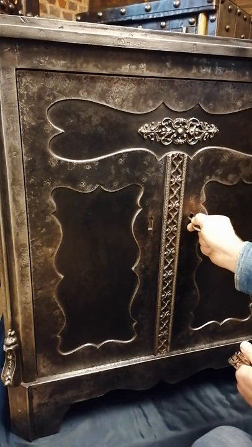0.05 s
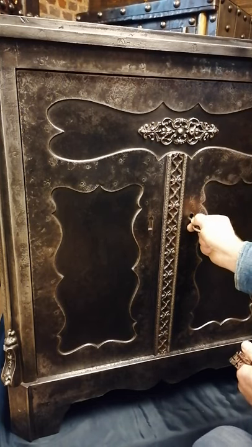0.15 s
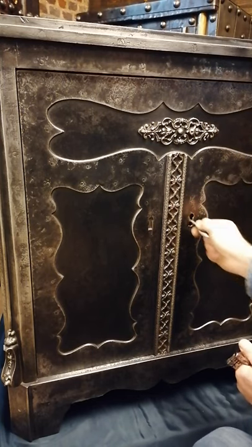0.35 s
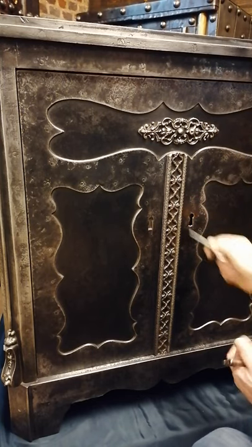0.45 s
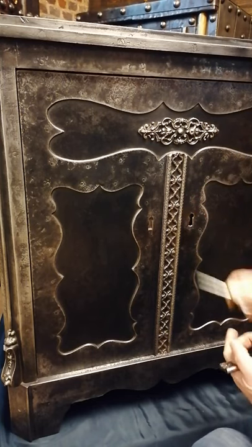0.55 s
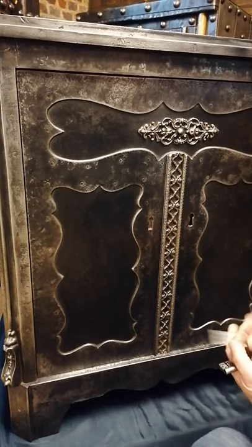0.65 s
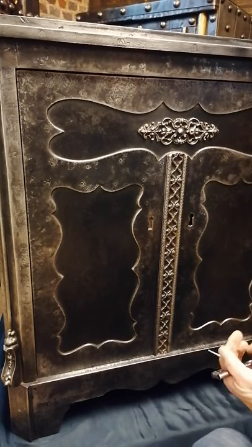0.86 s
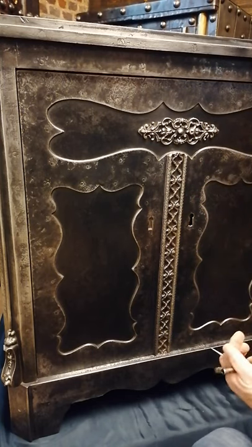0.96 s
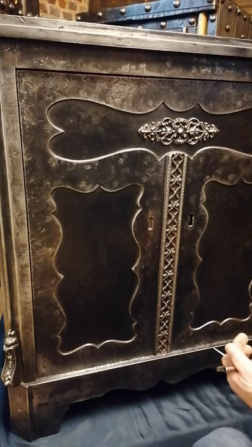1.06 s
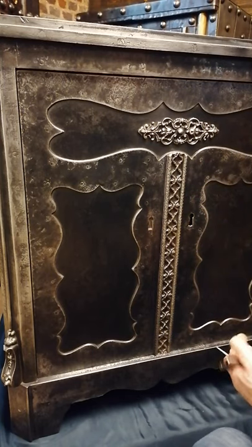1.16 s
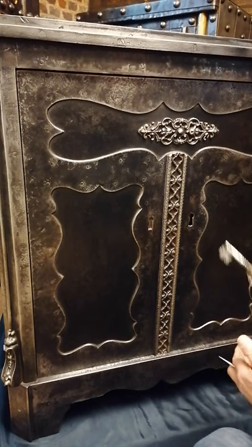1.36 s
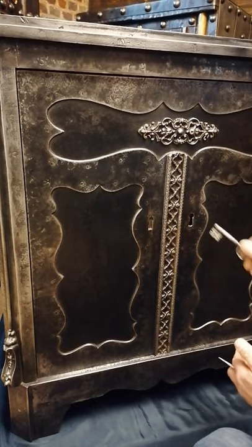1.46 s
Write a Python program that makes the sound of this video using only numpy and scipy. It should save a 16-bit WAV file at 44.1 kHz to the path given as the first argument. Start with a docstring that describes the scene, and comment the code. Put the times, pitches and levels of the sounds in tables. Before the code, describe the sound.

A key knocks softly inside an old iron safe lock, the bolt slams with a booming clang, then the key scrapes and clicks out, ringing thinly; close stereo pickup in a small, lively room, leaning left.

```python
"""A key is turned in an old iron safe: the wards knock softly, then the bolt shoots and the door booms and clangs.
The key clicks and rings as it is drawn out of the keyhole, then taps lightly once it is in the hand.
Contacts are short bursts of coloured noise with a diffuse echo; ringing iron is a sum of decaying modes.
A small, fairly live room with a low wavering hum; the sound leans to the left."""
import sys
import numpy as np
from scipy import signal
from scipy.fft import rfft, irfft
from scipy.io import wavfile

SR = 44100
rng = np.random.default_rng(int(sys.argv[2]) if len(sys.argv) > 2 else 0)


def transcribe(signal):
    """Save signal, clipped to [-1, 1], as a 16-bit WAV file at the path in sys.argv[1]."""
    frames = np.atleast_2d(signal).T
    limited = np.clip(frames, -1, 1)
    pcm = np.round(limited * 32767).astype(np.int16)
    wavfile.write(sys.argv[1], SR, pcm)


N = 66150

# stereo balance of the sources: freq_hz, left_minus_right_db
SOURCE_LEFT_DB = [(60, 5), (150, 6.5), (1000, 7.5), (4000, 4.5), (8000, 10), (15000, 6)]
BACKGROUND_LEFT_DB = 3  # for air and rustle
ALIKE_HZ = 800  # well below this both microphones hear the same wave
SOFT_RISE_S, HARD_RISE_S = .0014, .0003
ECHO_SIZE = 2 ** 15  # samples


def undb(db):
    """Amplitude ratio of a level: 20 dB is a factor of ten."""
    return 10 ** (np.asarray(db) / 20)


def clock():
    """Uniform sampling: the time of each sample in seconds."""
    return np.arange(N) / SR


def decay(t, t60):
    """Exponential damping: the amplitude falls by 60 dB in t60 seconds."""
    return np.exp(-np.log(1000) * t / t60)


def onset(t, rise_s):
    """Contact stiffness: the softer the contact, the slower the force builds up."""
    return 1 - np.exp(-(t / rise_s) ** 2)


def at(table, hz):
    """Interpolation on a log-frequency axis, which gives octaves equal width."""
    freq, value = np.array(table, float).T
    return np.interp(np.log(np.maximum(hz, 1)), np.log(freq), value)


def level_curve(table, offset_db=0):
    """Slow amplitude modulation: the gain follows a level drawn straight from point to point."""
    time_s, level_db = np.array(table).T
    return undb(offset_db + np.interp(clock(), time_s, level_db))


def lean(db):
    """Intensity stereo: left and right gains for a level difference."""
    return undb(np.array([[1], [-1]]) * db / 2)


def noise(colour, left_db=None, size=N):
    """Spatial coherence: coloured stereo noise of unit level, alike in the bass at both microphones."""
    freq = np.arange(size // 2 + 1) * SR / size
    if left_db is None:
        left_db = at(SOURCE_LEFT_DB, freq)
    mid, side = rfft(rng.standard_normal((2, size)))
    # random phases only; the colour alone sets the magnitudes
    mid, side = mid / abs(mid), side / abs(side)
    alike = 1 / (1 + (freq / ALIKE_HZ) ** 2)
    pair = np.sqrt(1 + alike) * mid + np.sqrt(1 - alike) * side * np.array([[1], [-1]])
    gain = undb(at(colour, freq))
    gain = gain * size / (2 * np.linalg.norm(gain))
    return irfft(pair * gain * lean(left_db), size)


def room_tail(colour):
    """Diffuse reverberation of one blow: each octave band dies at its own rate."""
    # reverberation time: freq_hz, t60_s
    room_t60 = [(120, 0.3), (300, 0.88), (1000, .6), (2500, 0.56), (5000, 0.58), (9000, 0.35),
                (15000, 0.17)]
    treble_db, build_s = -1, 0.0052  # treble tilt per 10 kHz; build-up time of the echo
    t = clock()[:ECHO_SIZE]
    freq = np.arange(ECHO_SIZE // 2 + 1) * SR / ECHO_SIZE
    spectrum = rfft(noise(colour, size=ECHO_SIZE)) * undb(treble_db * freq / 10000)
    centres = 125 * 2. ** np.arange(8)
    out = 0
    # each row of the identity picks one octave, with linear crossfades to its neighbours
    for hz, pick in zip(centres, np.eye(len(centres))):
        band = irfft(spectrum * at(np.c_[centres, pick], freq))
        out = out + band * decay(t, at(room_t60, hz))
    return out * (1 - np.exp(-t / build_s))


def add(out, sound, start):
    """Superposition: mixes a sound in from a given time in seconds."""
    i = int(start * SR)
    out[:, i:i + sound.shape[1]] += sound[:, :N - i]


def blows(rows, colour, db, t60, room_db, rise):
    """Impact excitation: each contact sets off a crowd of short-lived resonances, and the room answers."""
    out = np.zeros((2, N))
    t = clock()[:ECHO_SIZE // 8]
    envelope = onset(t, rise) * decay(t, t60)
    for start, size_db in rows:
        direct = envelope * noise(colour, size=len(t))
        add(out, undb(db + size_db) * direct, start)
        add(out, undb(db + size_db + room_db) * room_tail(colour), start)
    return out


def slow_chance(t, hz):
    """Random modulation: a complex drift for each microphone, with hz new values of unit RMS a second."""
    steps = rng.standard_normal((2, 256, 2)) @ np.array([1, 1j]) / np.sqrt(2)
    return np.array([np.interp(t * hz, np.arange(len(row)), row) for row in steps])


def ring(modes, waver):
    """Modal superposition: echoes make decaying modes waver; high ones reach the microphones out of step."""
    waver_hz = 39.6
    out = np.zeros((2, N))
    for hz, db, t60 in modes:
        t = clock()[:int(t60 * SR)]
        phase = (2 * rng.random() - 1) * min(hz / ALIKE_HZ, np.pi)
        skew = np.exp(1j * phase * np.array([[0], [1]]))  # turns the right channel only
        tone = np.exp(2j * np.pi * hz * t) * decay(t, t60)
        tone = tone * (skew + waver * slow_chance(t, waver_hz))
        add(out, undb(db) * lean(at(SOURCE_LEFT_DB, hz)) * tone.imag, 0)
    return out * onset(clock(), HARD_RISE_S)


def room_tone():
    """Stationary background: coloured noise for quiet air, and a sine for the hum that swells and fades."""
    # swell of the hum: time_s, level_db
    hum_level = [(0, -69.5), (.08, -70.5), (.12, -73), (.22, -62), (.28, -79), (.35, -62.5), (.59, -65.5),
                 (.63, -75.5), (.74, -71), (.86, -66), (1.03, -60.5), (1.5, -70)]
    # colour of the air: freq_hz, level_db
    air_colour = [(20, 0.5), (45, -3), (100, -3), (160, -5.5), (250, -15.5), (500, -14.5), (1000, -22.5),
                  (2000, -24.5), (4000, -29), (8000, -35), (15000, -48)]
    hum_hz, hum_db, air_db = 62.9, -0.5, -75
    sine = np.sqrt(2) * np.sin(2 * np.pi * hum_hz * clock())  # unit RMS
    hum = sine * level_curve(hum_level, hum_db)
    air = undb(air_db) * noise(air_colour, BACKGROUND_LEFT_DB)
    return hum * lean(at(SOURCE_LEFT_DB, hum_hz)) + air


def rustle():
    """Friction noise: the moving hand and sleeve rustle faintly as level-modulated noise."""
    # strength of the rustle: time_s, level_db
    rustle_level = [(0, -83), (0.751, -80), (.83, -76), (.97, -75.5), (1.099, -79), (1.5, -80)]
    # colour of the rustle: freq_hz, level_db
    rustle_colour = [(200, 3), (1400, 1), (2500, -2), (5000, -8), (9500, -15), (14000, -23.5)]
    return noise(rustle_colour, BACKGROUND_LEFT_DB) * level_curve(rustle_level)


def ward_knocks():
    """Soft impact: the key turning against the wards knocks dully, with a slow rise."""
    # knocks of the key: start_s, level_db
    knock_rows = [(0.0885, -12.5), (0.103, -23.5), (0.131, -17), (0.1815, -0.5), (0.195, -9.5),
                  (0.214, 7.5)]
    # colour of a knock: freq_hz, level_db
    knock_colour = [(60, -23), (140, 9.5), (200, -11.5), (380, 0), (570, -1), (950, -17.5), (1400, -14),
                    (1600, -27), (4000, -34), (12000, -55)]
    return blows(knock_rows, knock_colour, db=-47, t60=0.063, room_db=-5.5, rise=SOFT_RISE_S)


def bolt():
    """Impact and free vibration: the bolt hits its stop, chatters and rings the lock and the door."""
    # hits of the bolt: start_s, level_db
    bolt_rows = [(0.2205, -1), (0.2224, -1), (0.2274, -2), (0.2344, -10)]
    # colour of a hit: freq_hz, level_db
    bolt_colour = [(70, -21), (200, -8.5), (390, -4), (480, -6), (800, -4.5), (1000, -3), (1170, -1.5),
                   (1330, -8.5), (1780, 2), (2400, -9), (2900, -5.5), (3500, -6), (4700, -5.5),
                   (5500, -5.5), (6600, -10.5), (8400, -11), (9600, -6.5), (10500, -16.5), (15000, -19.5)]
    # modes of the iron door: freq_hz, level_db, t60_s
    door_modes = [(136, 0, .18), (149.5, -3, .52), (166, -5, .2), (279, -18.5, .75), (383, -9, .42),
                  (435, -11, .48), (588, -14, .62), (618, -15, .35), (667, -14, .45), (793, -11, .36),
                  (1030, -17, .45), (1150, -12, .42)]
    # modes of the bolt and lock plate: freq_hz, level_db, t60_s
    lock_modes = [(1557, 0, .45), (1770, 2, .36), (1864, 0, .42), (2950, -4, .35), (3289, -7, .35),
                  (4048, -5, .4), (4592, -6, .45), (4803, -4, .35), (4912, -6, .4), (5051, -6, .38),
                  (5313, -7, .36), (5456, -3, .38), (9184, -8, .3), (9565, -4, .34)]
    # long boom of the iron door, which lingers after the bolt hits: freq_hz, level_db, t60_s
    boom_modes = [(148.23, -57, 1.9)]
    door_db, door_swell_s, door_waver = -34, .005, .2
    lock_db, lock_waver = -45.5, .45
    out = blows(bolt_rows, bolt_colour, db=-28.5, t60=0.047, room_db=-8, rise=HARD_RISE_S)
    door = undb(door_db) * ring(door_modes, door_waver) * (1 - np.exp(-clock() / door_swell_s))
    lock = undb(lock_db) * ring(lock_modes, lock_waver)
    door_boom = ring(boom_modes, door_waver)
    add(out, door + lock + door_boom, bolt_rows[0][0])
    return out


def key_clicks():
    """Hard impact: the key catches in the keyhole with bright, short clicks."""
    # catches of the key: start_s, level_db
    click_rows = [(0.461, -0.5), (0.4625, 0), (0.5215, -3)]
    # colour of a click: freq_hz, level_db
    click_colour = [(300, -40), (1200, 2.5), (3000, 3), (5300, -19), (6200, -21), (7500, 6), (8600, -1.5),
                    (9800, 11), (11300, -11.5), (12300, -26), (15000, -32)]
    return blows(click_rows, click_colour, db=-47, t60=0.024, room_db=-13.5, rise=HARD_RISE_S)


def case_rubs():
    """Frictional excitation: the key's bit drags over the lock case, and each rub rings the case's modes."""
    # rubs on the case: start_s, level_db
    rub_rows = [(0.4625, 2.5), (0.483, -9), (0.499, -5), (0.535, -5.5), (0.552, -13.5), (0.58, -9.5)]
    # colour of a rub: freq_hz, level_db
    rub_colour = [(120, 2), (220, 2.5), (278, 5), (350, -16), (750, 1), (1200, -12.5), (1800, -4),
                  (2600, -3.5), (3400, -3), (4000, -6), (5500, -2.5), (7000, -9), (14000, -38)]
    # modes of the lock case: freq_hz, level_db, t60_s
    case_modes = [(277, 0, .42), (740, -7, .35), (1830, -6, .25), (3375, 0, .28), (3540, -2, .25),
                  (4694, -5, .25)]
    ring_db, case_waver = -62, 0.83
    out = blows(rub_rows, rub_colour, db=-51, t60=0.032, room_db=-6.5, rise=SOFT_RISE_S)
    for start, db in rub_rows:
        add(out, undb(ring_db + db) * ring(case_modes, case_waver), start)
    return out


def key_skid():
    """Impact and free vibration: the key's bit skids over the rim, and the key rings as it comes free."""
    # contacts of the skid: start_s, level_db
    skid_rows = [(0.5649, -5.5), (0.5702, 0), (0.573, -6)]
    # colour of a contact: freq_hz, level_db
    skid_colour = [(1000, -23), (5400, -24), (5900, -0.5), (6700, -6), (7500, -3), (8700, -6.5), (9800, 1),
                   (11500, -13), (13500, -14), (15000, -24)]
    # modes of the key: freq_hz, level_db, t60_s
    key_modes = [(5905, 1, .38), (6060, -3, .32), (6330, -8, .28), (7120, -5, .33), (7472, 1, .26),
                 (8263, -7, .3), (9308, -8, .27), (10170, -8, .21)]
    ring_db, key_waver = -64, 2.07
    out = blows(skid_rows, skid_colour, db=-48.5, t60=0.053, room_db=-12.5, rise=HARD_RISE_S)
    add(out, undb(ring_db) * ring(key_modes, key_waver), skid_rows[1][0])
    return out


def hand_taps():
    """Damped impact: the key taps lightly twice in the hand, and each tap dies quickly."""
    # taps in the hand: start_s, level_db
    tap_rows = [(0.791, 4.5), (0.794, -5)]
    # colour of a tap: freq_hz, level_db
    tap_colour = [(200, 0), (700, -17), (1200, 3), (1600, 1), (2000, 3), (3300, -14), (5000, -9),
                  (9800, -8), (15000, -40)]
    return blows(tap_rows, tap_colour, db=-60.5, t60=0.012, room_db=-20.5, rise=HARD_RISE_S)


def scene():
    """Superposition of the room, the turning lock, the withdrawn key and the hand."""
    background = room_tone() + rustle()
    turning = ward_knocks() + bolt()
    withdrawal = key_clicks() + case_rubs() + key_skid()
    return background + turning + withdrawal + hand_taps()


def record(dry):
    """Band limiting: the recorder cuts the top with a steep elliptic low-pass."""
    top_hz, ripple_db, stop_db = 15400, .2, 70
    low_pass = signal.ellip(8, ripple_db, stop_db, top_hz, fs=SR, output="sos")
    return signal.sosfilt(low_pass, dry)


dry = scene()
out = record(dry)
transcribe(out)
```